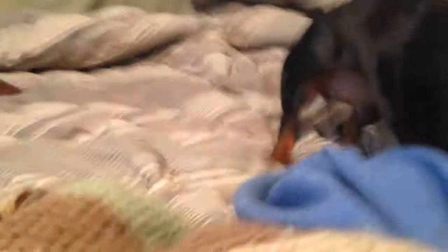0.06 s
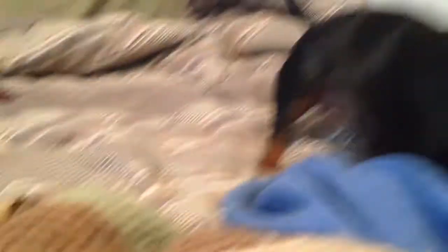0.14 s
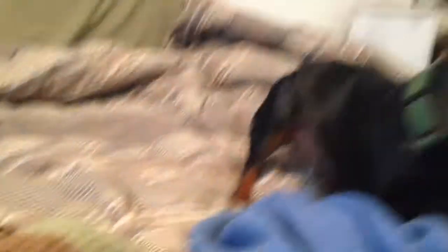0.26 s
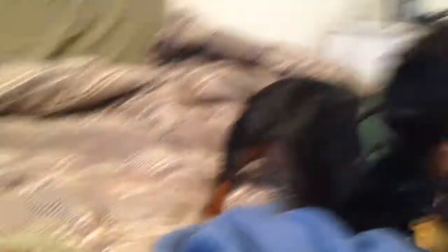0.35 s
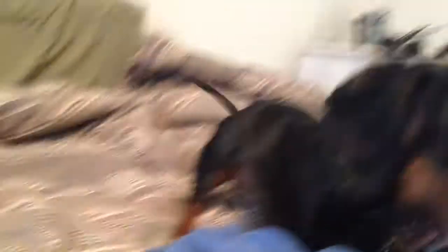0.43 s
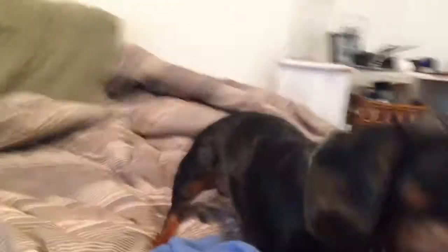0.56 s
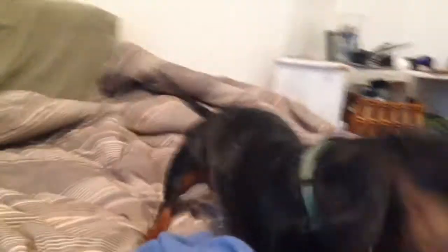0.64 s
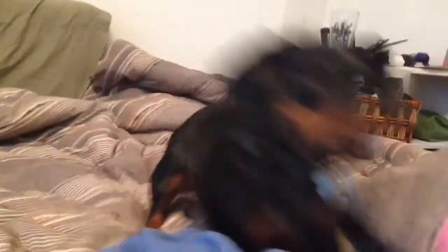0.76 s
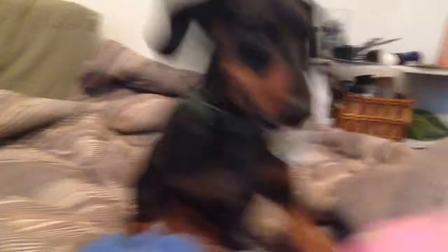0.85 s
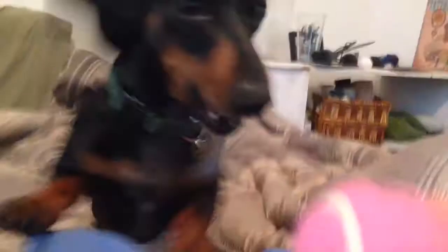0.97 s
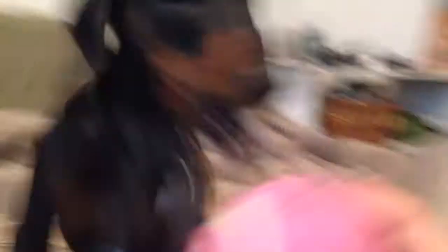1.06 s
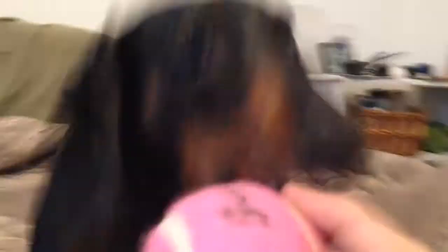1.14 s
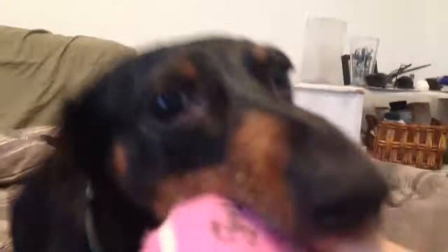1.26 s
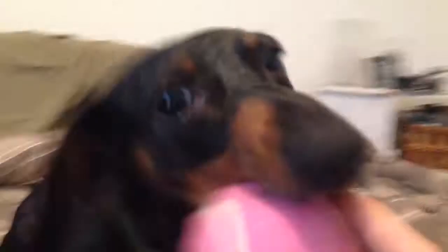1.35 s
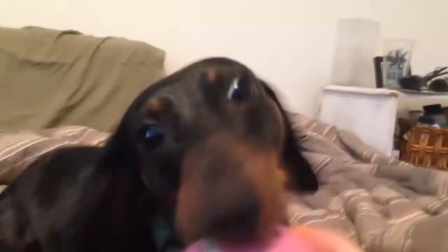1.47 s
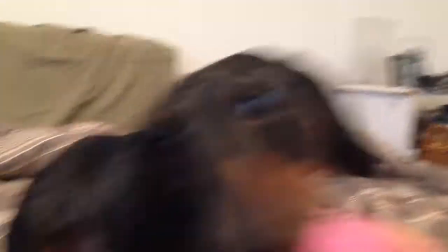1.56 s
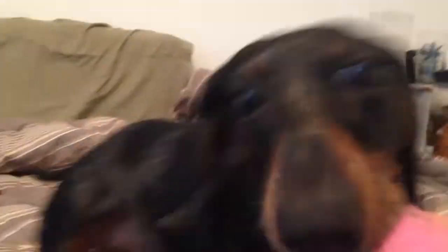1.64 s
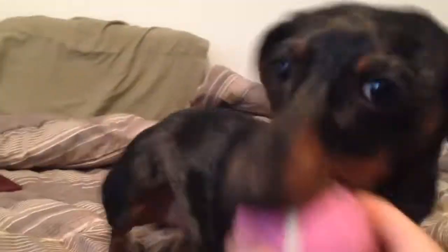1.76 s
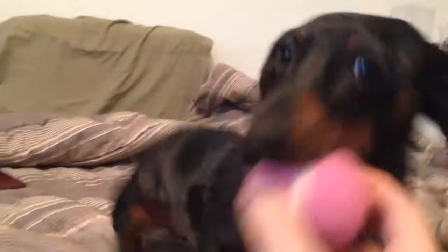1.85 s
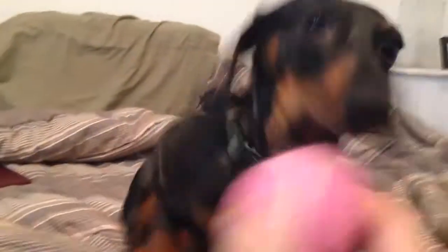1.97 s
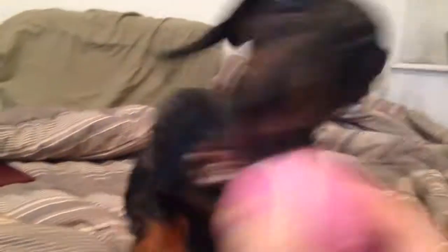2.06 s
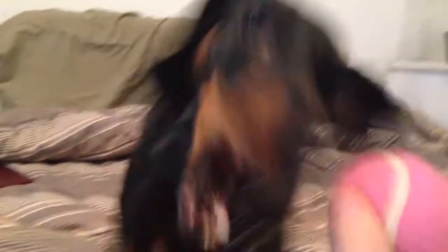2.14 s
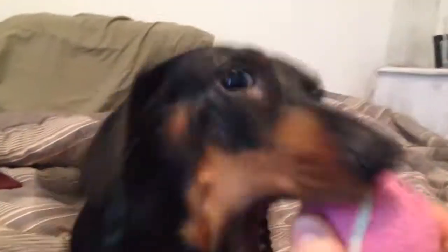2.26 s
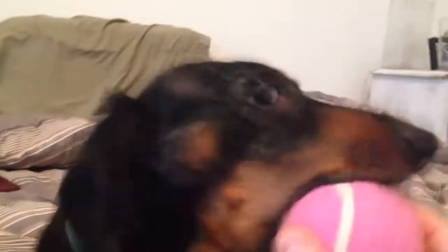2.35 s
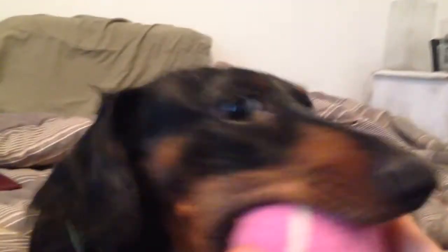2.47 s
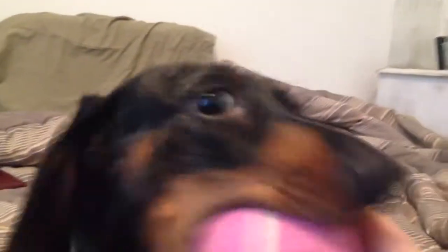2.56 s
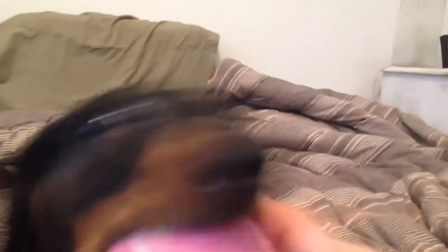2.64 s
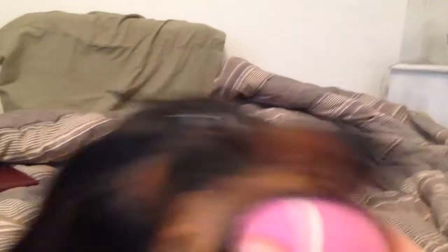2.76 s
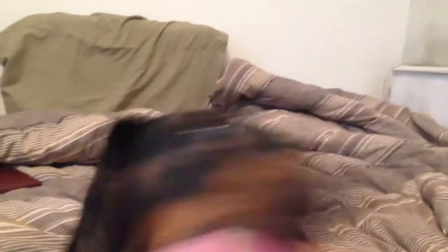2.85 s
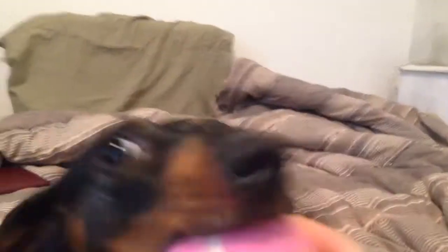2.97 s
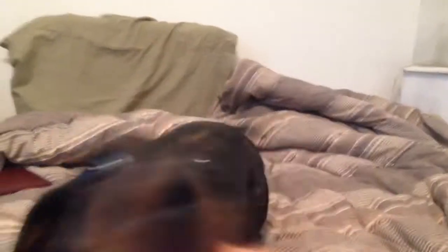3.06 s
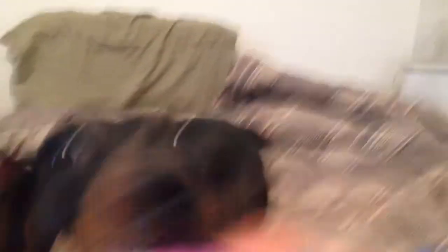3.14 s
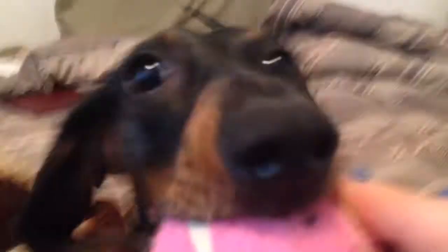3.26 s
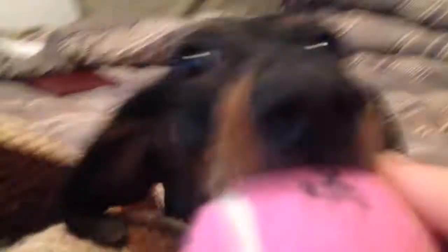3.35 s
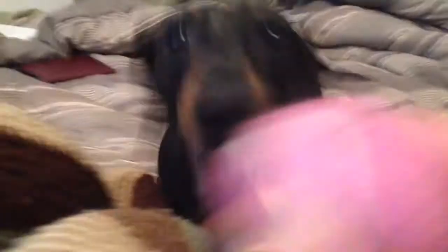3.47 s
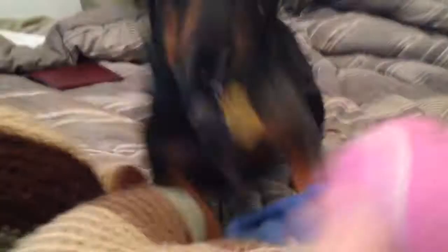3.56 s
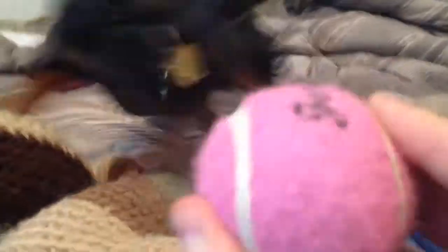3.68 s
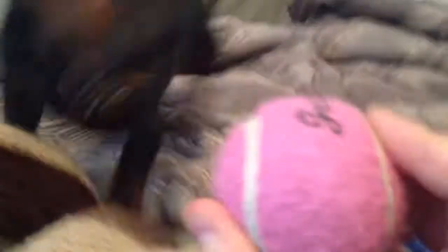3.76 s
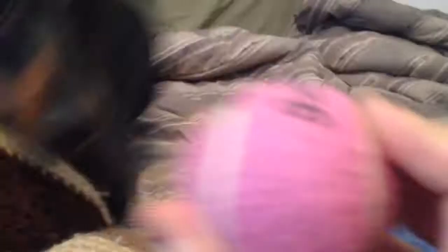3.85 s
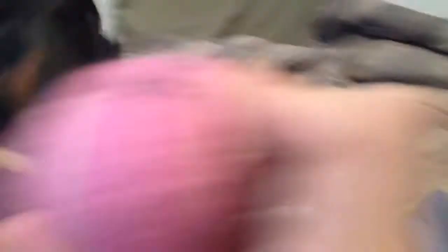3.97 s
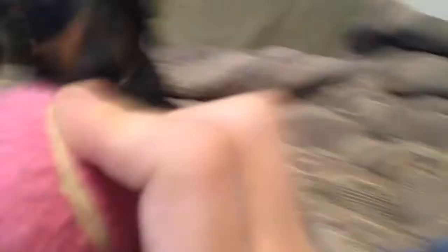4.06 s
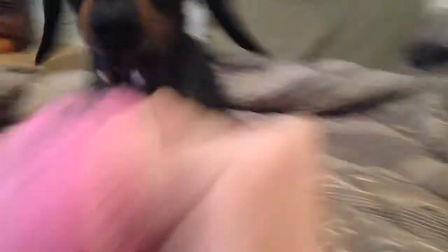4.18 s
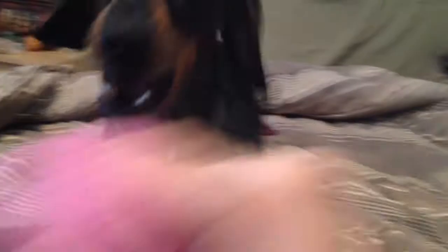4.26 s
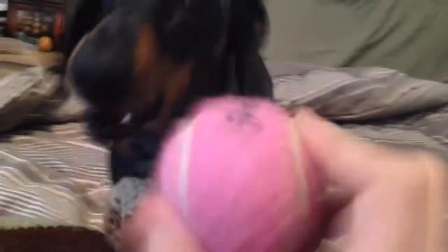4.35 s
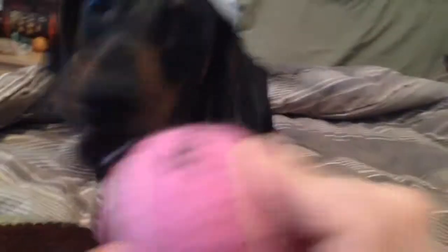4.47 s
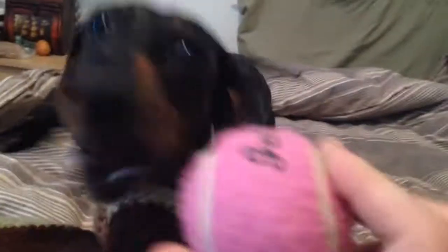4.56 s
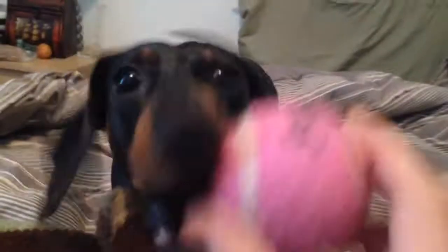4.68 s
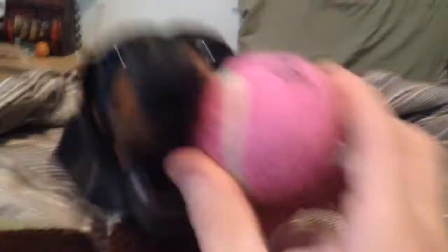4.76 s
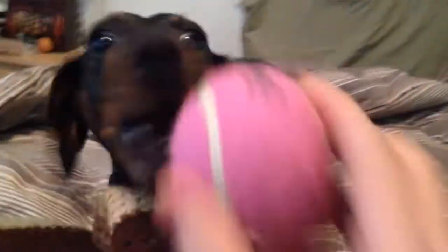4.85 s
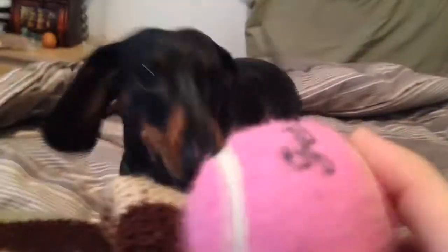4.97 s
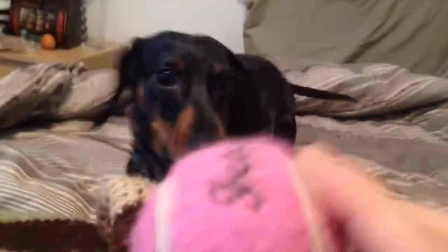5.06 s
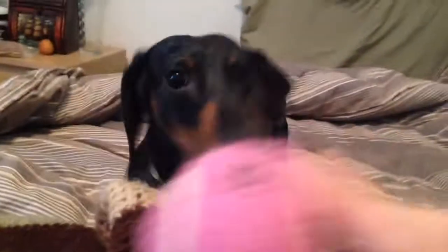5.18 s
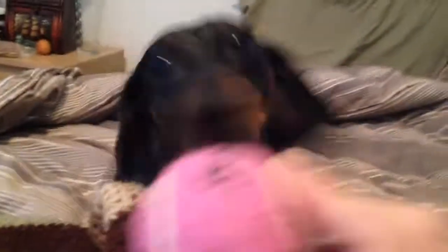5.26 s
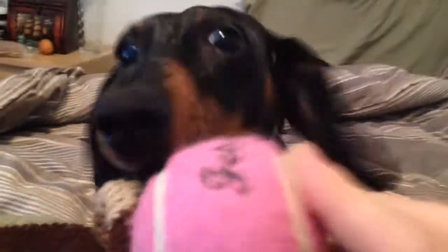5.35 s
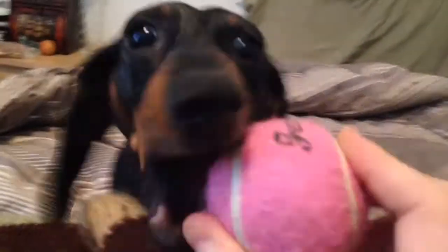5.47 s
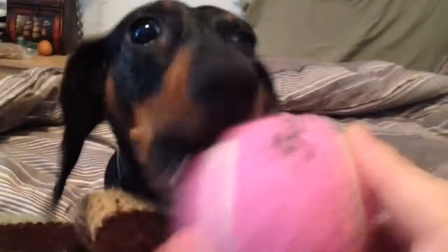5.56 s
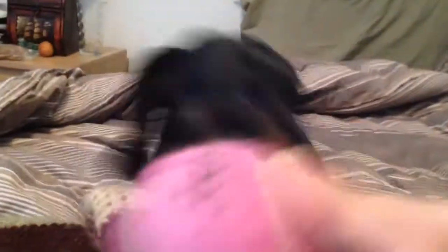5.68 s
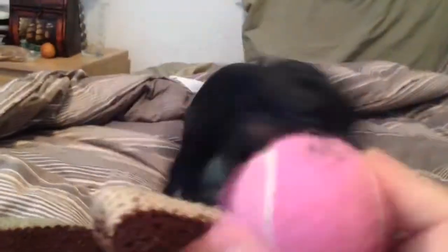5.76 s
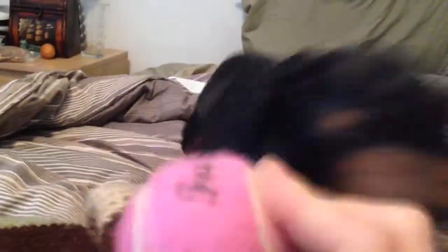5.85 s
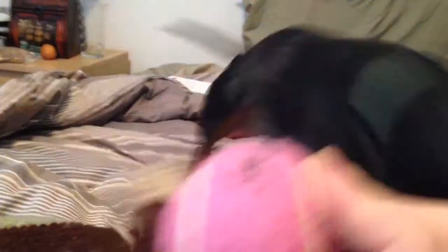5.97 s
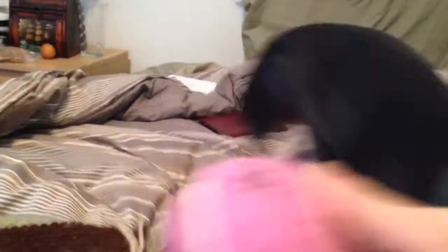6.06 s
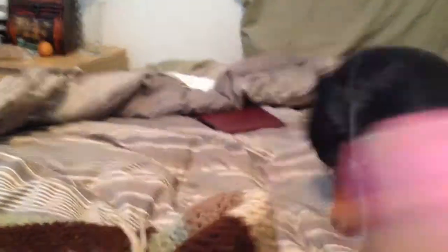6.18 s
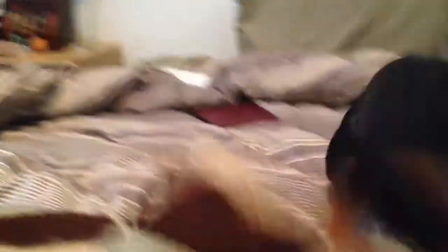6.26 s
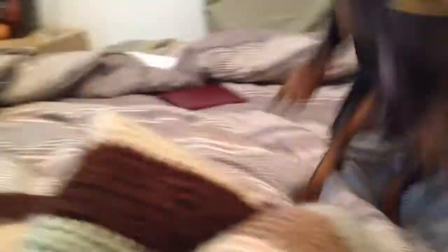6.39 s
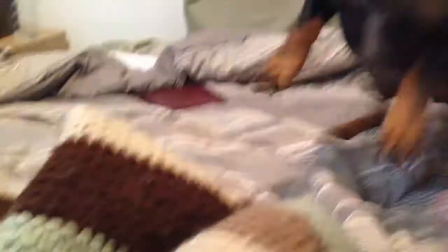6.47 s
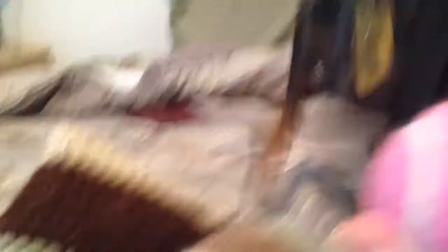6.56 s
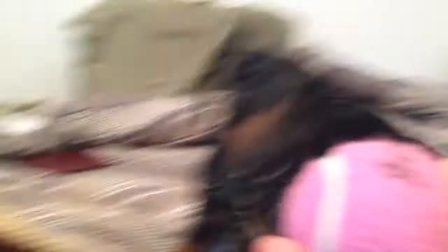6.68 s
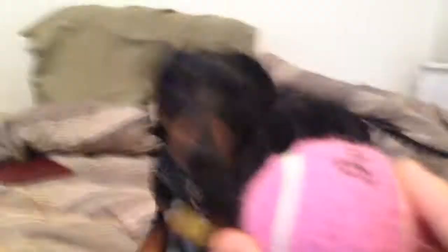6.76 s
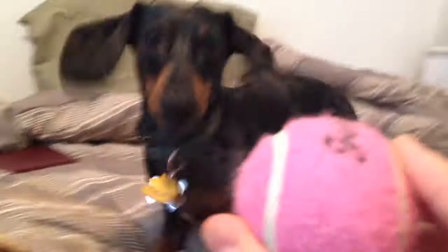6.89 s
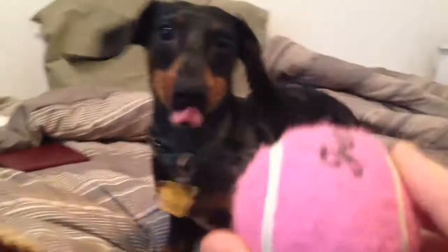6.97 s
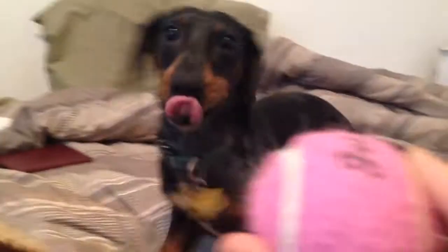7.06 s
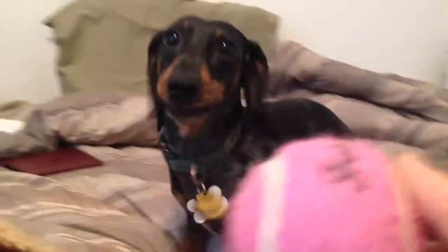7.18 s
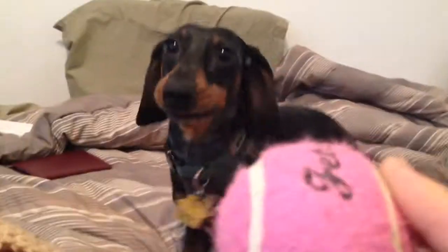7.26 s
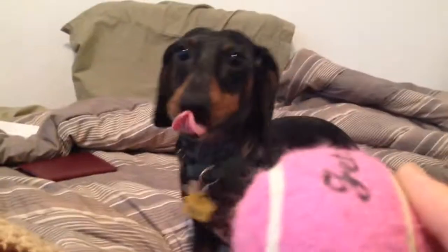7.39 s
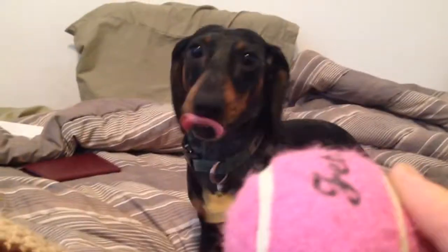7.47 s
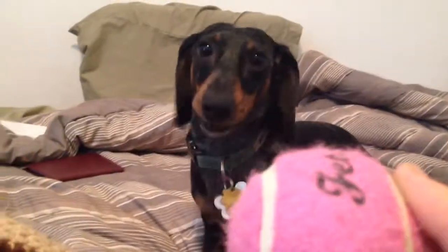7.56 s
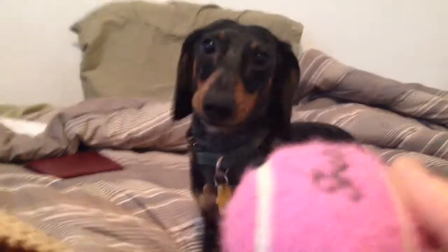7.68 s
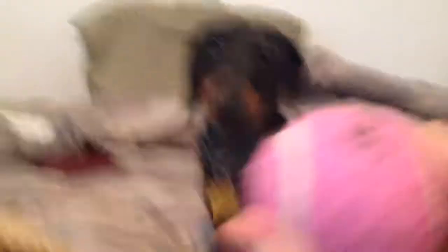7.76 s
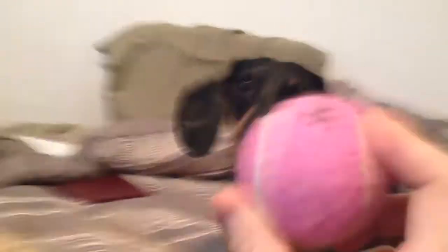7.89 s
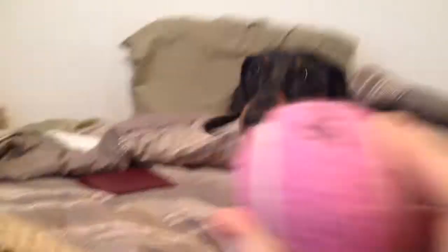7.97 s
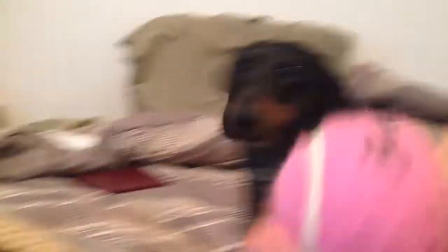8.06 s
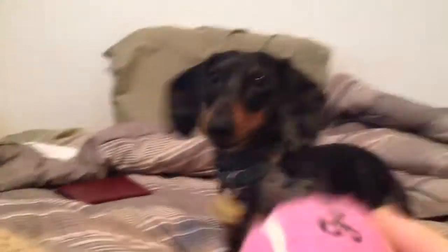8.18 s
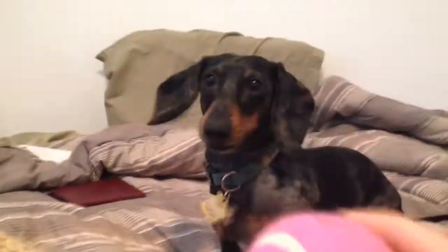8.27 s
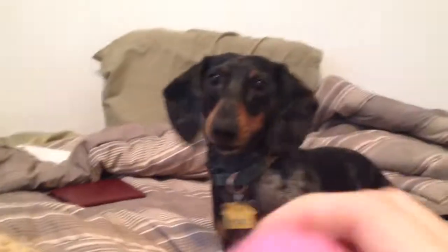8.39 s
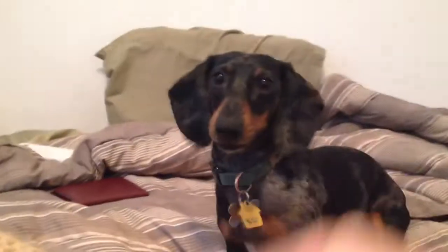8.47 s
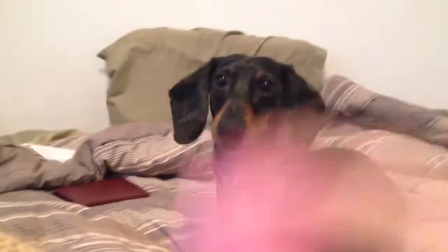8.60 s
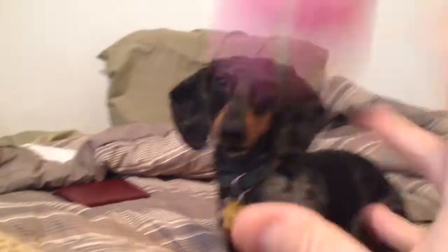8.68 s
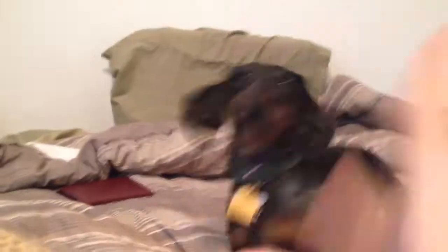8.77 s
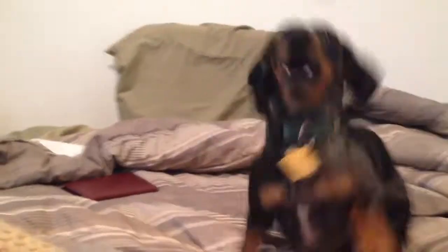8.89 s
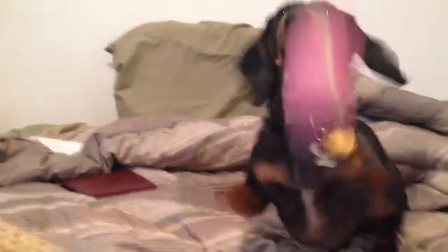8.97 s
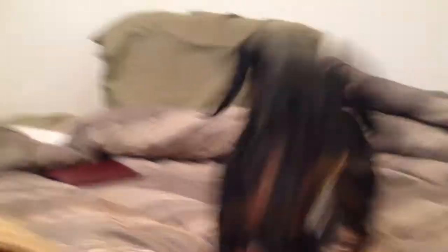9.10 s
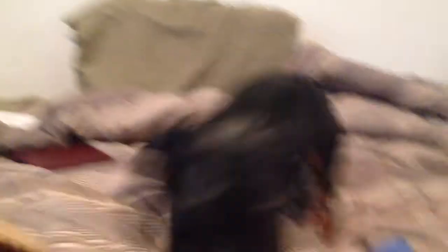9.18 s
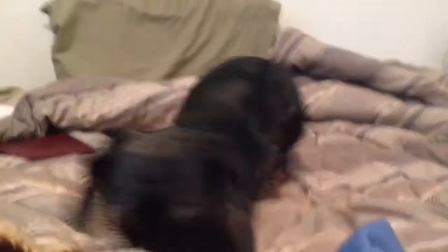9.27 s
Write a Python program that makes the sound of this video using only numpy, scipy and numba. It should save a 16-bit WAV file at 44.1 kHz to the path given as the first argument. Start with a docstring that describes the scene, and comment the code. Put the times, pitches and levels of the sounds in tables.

```python
"""Play growls from a small dog on a bed, close to a phone in a quiet furnished bedroom; one clears to a whine.
Collar tags clink, the dog pants between growls, paws thud on the bedding, an appliance hums far off.
Uneven vocal-fold pulses ring throat and mouth resonances; noise rasps after each pulse.
Tags are decaying sines with noise ticks, pants and room filtered noise, thuds short sine bursts."""
import sys
import numpy as np
from scipy import signal
from scipy.fft import rfft, irfft
from scipy.io import wavfile
from scipy.ndimage import uniform_filter1d
from numba import njit

SR = 44100
rng = np.random.default_rng(int(sys.argv[2]) if len(sys.argv) > 2 else 0)


def inscribe(sig):
    """Save sig as 16-bit PCM at rate SR to the path in sys.argv[1].

    A 1-D sig is mono; a 2-D sig holds one channel per row.
    Samples are clipped to [-1, 1] before scaling.
    """
    pcm = np.round(np.clip(np.atleast_2d(sig).T, -1, 1) * 32767)
    wavfile.write(sys.argv[1], SR, pcm.astype(np.int16))


N = 411453

# Room air spectrum. Each row: frequency in Hz, relative density in dB per Hz.
ROOM_SPECTRUM = [(25, -28), (55, -1), (90, -14.5), (130, -2), (390, -8.5), (700, -13), (1100, -17.5),
                 (2200, -19.5), (2800, -29), (3500, -26), (15500, -34.5)]
# Appliance lines. Each row: centre in Hz, width in Hz of the noise band, rms level in dB.
HUM_LINES = [(130, 2.3, -66), (717, 7.7, -69.5)]
# Tag vibration modes. Each row: frequency in Hz, relative level in dB, longest t60 in s.
TAG_MODES = [(5760, 8.5, 0.3), (6770, 13.5, 0.17), (12260, -7, .17), (12445, -2.5, 0.19),
             (14420, -5, 0.126)]
# Tag contacts. Each row: start in s, tick drive in dB, low tag ring in dB, high tag ring in dB.
CLINKS = [(0.038, -33.5, -69, -49), (0.661, -43, -73, -52), (0.817, -43, -47.5, -33.5),
          (0.827, -39, -64, -45), (0.9283, -31, -49, -39), (0.958, -41, -60, -50), (0.998, -37.5, -68, -54),
          (1.1592, -38.5, -58, -51), (2.057, -73, -67, -62), (2.2116, -45, -73, -55),
          (3.589, -28, -55, -43), (3.613, -27.5, -49.5, -41), (3.649, -45, -61.5, -43),
          (3.952, -41, -63, -40), (4.294, -39, -67, -65), (5.044, -62, -64, -56),
          (5.0909, -68.5, -63, -47.5), (5.8257, -49, -75, -49), (6.0367, -46.5, -57, -55),
          (6.5044, -16, -63, -42), (6.5441, -49, -53, -37), (6.6777, -44.5, -64, -40.5),
          (6.8376, -43, -65, -47), (8.97, -45.5, -73, -64), (9.111, -56.5, -68.5, -62),
          (9.214, -37, -52.5, -37), (9.267, -39, -60, -57)]
# One table a growl, full voice to last breath.
# Each row: time in s, throat level in dB, mouth over throat in dB before surges, mean pitch in Hz.
GROWLS = [
    [(0.688, -27.5, -23, 176.6), (0.733, -24.5, -4.5, 171.5), (0.758, -30, 3.5, 170.5)],
    [(1.287, -20, -58, 159.1), (1.347, -22, 2.5, 174), (1.412, -19, 2, 192.1), (1.532, -22.5, 3, 206.2),
     (1.746, -21, -1, 183.8), (1.786, -28, -16, 155.5), (1.846, -44.5, -7, 152), (1.99, -40.5, -5, 155)],
    [(2.305, -23.5, -7.5, 164.5), (2.39, -23.5, 3.5, 208.6), (2.52, -23, 5, 212.1),
     (2.57, -22.5, -1.5, 190.7), (2.794, -23.5, -3, 186.6), (3.004, -29, -10.5, 168)],
    [(3.322, -18, -16, 165.2), (3.417, -15, -8, 196.4), (3.537, -21, 6.5, 199.4), (3.6, -40.5, -6.5, 190),
     (3.675, -22, -5.5, 181.7), (3.702, -33, -4, 182.7)],
    [(3.876, -26.5, -14, 165), (3.956, -23, -14, 195.4), (3.996, -25, 6.5, 201.6), (4.09, -29, -7, 199.8),
     (4.146, -35.5, -0.5, 163.6)],
    [(4.719, -26.5, -10.5, 172.4), (4.8, -19.5, -1.5, 192.7), (4.98, -19.5, -0.5, 202.5),
     (5.03, -21.5, -3, 201), (5.07, -31.5, -2, 179.2), (5.13, -30.5, -6.5, 193.2), (5.22, -26, -3, 186.6),
     (5.3, -22.5, 7, 237.8), (5.36, -29.5, 18, 238), (5.402, -23.5, 7.5, 264.7), (5.44, -24, 7.5, 271.1),
     (5.474, -22, 9.5, 252.2), (5.512, -25, 8.5, 207.1), (5.59, -22, 9, 229.8), (5.7, -24, -6.5, 203),
     (5.75, -37.5, -10.5, 201.5), (5.81, -36.5, -8, 192)],
    [(6.076, -28, 4.5, 178.8), (6.121, -20, 9, 194), (6.168, -28, 15, 241.8), (6.22, -38, 25, 270.7),
     (6.3, -39, 9, 233), (6.325, -40, 3.5, 188.2), (6.37, -40, 0.5, 168), (6.425, -26.5, 0.5, 217.6),
     (6.465, -39.5, 7.5, 189), (6.515, -42, -56, 160.1)],
    [(6.919, -37, -9, 161.7), (7.054, -32.5, -23.5, 185.6), (7.189, -32, 3.5, 195.7),
     (7.24, -31.5, -11.5, 189.5), (7.638, -38.5, -10.5, 161.5)],
    [(9.174, -27, -22, 190.4), (9.33, -30.5, -39, 182.2)],
]
# Jaw postures, each held until the next. Each row: start in s, roughness 0-1, in-between pulse 0-1,
# base mouth resonance in Hz, second in Hz, second level in dB, third level in dB, base rasp in Hz,
# base rasp level in dB, mean lip hiss in dB.
JAWS = [(0.6, 0.85, .4, 970, 1570, -6, -11, 3780, -13, -21),
        (1.2, 0.85, .45, 946, 1426, -3, -10, 5472, -17.5, 3.5),
        (1.8, 0.8, .15, 917, 1350, -7, -6.5, 3950, -1, -6),
        (2.2, 0.85, .3, 946, 1570, -6.5, -10.5, 4630, -7.5, 7.5),
        (2.38, 0.7, .6, 924, 1346, -6, -19, 4600, -29.5, 16.5),
        (2.55, 0.9, .3, 847, 1310, -7, -19.5, 4160, -22, 7),
        (3.2, 0.92, .35, 849, 1310, -7.5, -22, 4490, -11, -8),
        (3.45, 0.86, .45, 934.4, 1420, -5.5, -4.5, 4730, -18.5, 3),
        (3.58, 0.86, .3, 874.6, 1607, -3, -7, 3933, -24, 10.5),
        (3.8, 0.77, .6, 751.3, 1617, -20, -9, 3418, -14, 6),
        (3.96, 0.87, .4, 831.5, 1322, -19, -4.5, 3234, -38, 14),
        (4.6, 0.75, .55, 863.7, 1570, -6.5, -10.5, 5217, -8.5, -8.5),
        (4.9, 0.61, .7, 800.4, 1530, -15, -14, 5080, -24.5, -1),
        (5.05, 0.77, .25, 864.6, 1500, -8, -4.5, 4664, -32, 8.5),
        (5.24, 0.16, .85, 945.6, 1773, -3.5, -7, 4218, -16.5, -1),
        (5.38, 0.02, .8, 952.7, 1620, -3.5, -8, 7500, -9.5, -5.5),
        (5.49, 0.3, 0.85, 879, 1692, -9.5, -10.5, 4700, -24, 2.5),
        (5.72, 0.5, .1, 850, 1450, -7.5, -4.5, 4700, -39, 0.5),
        (6.0, 0.65, .6, 846.4, 1500, -5.5, -17, 5508, -22.5, -9.5),
        (6.16, 0.34, .6, 827, 1537, -5.5, -12.5, 4574, -8, -11),
        (6.33, 0.78, .35, 853, 1400, -13, -8, 5507, -13.5, 13.5),
        (6.8, 0.75, .5, 748, 1436, -8, -10, 4265, -18, 7),
        (7.03, 0.6, .8, 755.6, 1423, -4, -10, 4140, -11, -1),
        (7.13, 0.8, .3, 776, 1506, -20, -13.5, 4070, -21.5, 4.5),
        (9.0, 0.89, .3, 762.5, 1523, -20, -19, 4166, -6, 16.5)]
# Mouth side pocket. Each row: time in s, swallowed frequency in Hz, open-mouth ring above it in Hz.
POCKET = [(1.5, 2670, 3274), (2.9, 2570, 3387), (3.35, 2936, 3271), (3.65, 2747, 3294), (4.1, 2880, 3120),
          (5.3, 2812, 3216), (6.1, 2647, 3073)]
# Throat resonances. Each row: frequency in Hz, width in Hz of each of two stages, relative level in dB.
THROAT_MODES = [(162.5, 160, 12.5), (398, 388, 3)]
# Lip hiss resonances. Each row: frequency in Hz, width in Hz of each of two stages, relative level in dB.
LIP_MODES = [(5690, 1600, -8.5), (9600, 1900, -17), (13100, 3000, -23)]
# Widths of the three mouth resonances, in Hz for each of two stages.
MOUTH_WIDTHS_HZ = (444, 444, 370)
# Ring above the pocket: width in Hz of each of two stages, relative level in dB.
GAPE = (460, 0)
# One table a breath. Each row: time in s, level in dB.
PANTS = [
    [(2.02, -54), (2.05, -38), (2.15, -49.5), (2.25, -69)],
    [(3.05, -52.5), (3.25, -65)],
    [(3.75, -58), (3.8, -57), (3.83, -66)],
    [(5.84, -64), (5.87, -48), (5.93, -66)],
]
# Panting mouth resonances. Each row: frequency in Hz, width in Hz of each of two stages, relative level in dB.
PANT_MODES = [(1340, 500, 14.5), (2190, 590, 3.5), (3740, 2700, -4)]
# Paws on the bedding. Each row: start in s, envelope peak in dB, frequency in Hz.
THUMPS = [(9.03, -32.5, 393)]

ROOM_DB = -56.5
CLINK_SCATTER_DB = 1  # each contact favours other modes
SHORTEST_RING_SHARE = .45  # fur damps some clinks to this share of t60
ATTACK_S, RELEASE_S, SILENT_DB = 0.042, 0.041, -43.5  # silence relative to each growl's ends
ONSET_PITCH_RATIO = .85
JAW_MOVE_S = 0.021
SETTLE_S, FIRST_BEATS_SHARE = .07, .35  # first beats are cleaner and nearer single
PITCH_WOBBLE = .03  # share of pitch, at full roughness
FLOW_JITTER, WEAK_CLOSING = .7, .8  # ratios: flow to closing jitter, in-between closing to flow
SURGE_DB = 3.5  # a rough voice leaves the mouth in uneven bursts
MOUTH_RISE_HZ_PER_DB = 1
RASP_DB_PER_MOUTH_DB, RASP_DROP_HZ_PER_DB = 0.8932, 86  # a wider mouth rasps louder and lower
GAPE_DB_PER_MOUTH_DB = 1.02
THIRD_UNDER_POCKET_HZ = 620
NOSE_DIP_HZ, NOSE_DIP_WIDTH_HZ, SMALL_CHEST_HZ = 556.3, 110, 131
ECHO_T60_S, ECHO_DB = 0.17, -17
MIC_LOW_HZ, TOP_HZ = 110, 15600


def undb(db):
    """Decibels to gain."""
    return 10 ** (np.asarray(db) / 20)


@njit
def svf(x, hz, width_hz):
    """State-variable band-pass with a moving centre, gain 1 there."""
    y, b, l = np.empty(len(x)), 0., 0.
    for i in range(len(x)):
        g, k = np.tan(np.pi * hz[i] / SR), width_hz / hz[i]
        v = (b + g * (x[i] - l)) / (1 + g * (g + k))
        b, l, y[i] = 2 * v - b, l + 2 * g * v, k * v
    return y


def band(x, hz, width_hz):
    """One resonance, fixed or moving."""
    return svf(x + 1e-18, hz + np.zeros(N), 1. * width_hz)


def body(x, modes):
    """Two-stage resonances in parallel, of alternating sign."""
    out = 0
    for k, (hz, width_hz, db) in enumerate(modes):
        out = out + (-1) ** k * undb(db) * band(band(x, hz, width_hz), hz, width_hz)
    return out


def even(x, window_s=N / SR):
    """Running rms brought to 1."""
    return x / np.sqrt(uniform_filter1d(x ** 2, int(window_s * SR)) + 1e-18)


def walk(rate):
    """Smoothed noise of rms 1 that turns about rate times a second."""
    once = uniform_filter1d(rng.standard_normal(N), SR // rate)
    return even(uniform_filter1d(once, SR // rate))


def along(rows):
    """Each column of (s, value, ..) rows as a line over time."""
    s, *cols = np.transpose(rows)
    return [np.interp(np.arange(N) / SR, s, c) for c in cols]


def held(rows):
    """Each column keeps its value from row to row and moves over quickly."""
    rows = np.array(rows)
    k = np.maximum(np.searchsorted(rows[:, 0], np.arange(N) / SR) - 1, 0)
    return uniform_filter1d(rows[k, 1:].T, int(JAW_MOVE_S * SR), axis=1)


def columns(tables):
    """A gate that shuts softly outside the tables, and their columns joined over time."""
    t = np.arange(N) / SR
    gate = sum((t > table[0][0]) & (t < table[-1][0]) for table in tables)
    return uniform_filter1d(1. * gate, 400), along(np.concatenate(tables))


def room():
    """Shaped noise of wavering level, plus narrow noise bands as the appliance's unsteady lines."""
    f = np.arange(N // 2 + 1) * SR / N + 1  # +1 Hz keeps the log finite
    hz, db = np.transpose(ROOM_SPECTRUM)
    shape = undb(np.interp(np.log(f), np.log(hz), db))
    air = irfft(rfft(rng.standard_normal(N)) * shape, N)
    swell = undb(0.5 * walk(rate=7))
    hum = sum(undb(d) * even(band(rng.standard_normal(N), h, w)) for h, w, d in HUM_LINES)
    return undb(ROOM_DB) * even(air) * swell + hum


def tag_rings(starts):
    """Metal modes decay exponentially; the next contact stops the ring before it."""
    out = np.zeros(N + SR)
    hz, mode_db, t60_s = np.transpose(TAG_MODES)[:, :, None]
    turns = rng.random((len(CLINKS), len(TAG_MODES), 1))
    favour_db = CLINK_SCATTER_DB * rng.standard_normal(turns.shape)
    ring_share = SHORTEST_RING_SHARE + (1 - SHORTEST_RING_SHARE) * turns[:, 2]
    for k, (_, _, low_db, high_db) in enumerate(CLINKS):
        t = np.arange(min(starts[k + 1] - starts[k], SR // 2)) / SR
        db = mode_db + np.where(hz < 8000, low_db, high_db) + favour_db[k]
        db = db + 4 * np.sin(2 * np.pi * (14 * t + 3 * turns[k]))  # the tag twists as it rings
        decay = undb(db - 60 * t / (t60_s * ring_share[k]))
        ring = np.sum(decay * np.sin(2 * np.pi * (hz * t + turns[k])), axis=0)
        out[starts[k]:starts[k] + len(t)] += ring
    return out[:N]


def tag_ticks(starts):
    """Each contact is a brief decaying burst of bright noise."""
    hits = np.zeros(N)
    hits[starts[:-1]] = undb(np.array(CLINKS)[:, 1])
    decay = signal.lfilter([1], [1, -np.exp(-1 / (0.0032 * SR))], hits)
    ticks = decay * rng.standard_normal(N)
    return band(band(ticks, 6300, 8000), 6300, 8000)


def tags():
    """Each contact ticks and rings the collar tags."""
    starts = [int(row[0] * SR) for row in CLINKS] + [N]
    return tag_rings(starts) + tag_ticks(starts)


def efforts():
    """Growl tables with a quick rise before and a quick fall after each."""
    def edge(row, shift_s, pitch_ratio):
        return (row[0] + shift_s, row[1] + SILENT_DB, row[2], pitch_ratio * row[3])
    return [[edge(g[0], -ATTACK_S, ONSET_PITCH_RATIO)] + list(g) + [edge(g[-1], RELEASE_S, 1)]
            for g in GROWLS]


def folds(pitch_hz, set_rough, weak):
    """Strong and in-between pulses each cycle, scattered by roughness; returns flow, closings, roughness."""
    t = np.arange(N) / SR
    starts = np.array([g[0][0] - ATTACK_S for g in GROWLS])
    since = t - starts[np.maximum(np.searchsorted(starts, t) - 1, 0)]
    settled = np.interp(since, [0, SETTLE_S], [FIRST_BEATS_SHARE, 1])
    rough = np.clip(set_rough, 0, 1) * settled
    second = np.clip(weak, 0, 1) * settled
    cycles = np.cumsum(pitch_hz * (1 + PITCH_WOBBLE * rough * walk(rate=14))) / SR
    beat = np.arange(1, 2 * cycles[-1] - 2)  # half cycles
    r = np.interp(beat / 2, cycles, rough)
    # folds miss a beat more easily than they overshoot
    chance = np.clip(rng.standard_normal((len(beat), 4)).T, -2, 1.3)
    chance = chance - chance.mean(axis=1, keepdims=True)
    drift = signal.lfilter([1], [1, -.9], chance[2])  # timing slips last several cycles
    # for stretches every other cycle is weaker and shifted: lines at half the pitch
    stretch = np.tanh(.5 * signal.lfilter([1], [1, -.93], chance[3]))
    limp = r * np.cos(np.pi * beat / 2) * stretch
    slip = r * (.075 * chance[0] + .055 * drift)
    trains = np.zeros((2, N + 1))
    for train, scatter_db, jitter, soft in zip(trains, (3, 4.5), (FLOW_JITTER, 1), (1, WEAK_CLOSING)):
        at = np.interp(beat / 2 + jitter * slip + .13 * limp, cycles, t)
        size = np.where(beat % 2, soft * np.interp(at, t, second), 1) * (1 + .55 * limp)
        size = size * undb(scatter_db * r * chance[1])
        i = np.minimum(at * SR, N - 1)
        # split each pulse over two samples for exact timing
        np.add.at(train, i.astype(int), size * (1 - i % 1))
        np.add.at(train, i.astype(int) + 1, size * (i % 1))
    return trains[0, :N], trains[1, :N], rough


def rasp_and_hiss(air, rasp_hz, lips_db, gape_hz, mouth_db):
    """Pulsed air rings a rasp band, shifting lip hiss and the open-mouth ring."""
    out = band(band(air, rasp_hz, 900), rasp_hz, 1200)
    for mode in LIP_MODES:
        out = out + undb(lips_db + 4.2 * walk(rate=8)) * body(air, [mode])  # lips and tongue keep shifting
    gape_db = GAPE_DB_PER_MOUTH_DB * np.clip(mouth_db, -15, 8)
    return out + undb(gape_db) * body(air, [(gape_hz, *GAPE)])


def growls():
    """Throat, mouth and rasp resonate to the same vocal-fold beats."""
    gate, (throat_db, mouth_db, pitch_hz) = columns(efforts())
    (set_rough, weak, mouth_hz, second_hz, second_db, third_db,
     rasp_hz, rasp_db, lips_db) = held(JAWS)
    pocket_hz, gape_hz = along(POCKET)
    rasp_db = rasp_db + RASP_DB_PER_MOUTH_DB * mouth_db
    mouth_hz = mouth_hz + MOUTH_RISE_HZ_PER_DB * np.maximum(mouth_db, -10)
    rasp_hz = rasp_hz - RASP_DROP_HZ_PER_DB * np.maximum(mouth_db, 0)

    flow, closings, rough = folds(pitch_hz, set_rough, weak)
    puff = signal.lfilter([1], [1, -np.exp(-1 / (0.0034 * SR))], closings)  # air rushes after each pulse
    hiss = rough * puff * rng.standard_normal(N)
    source = closings + 0.07 * hiss

    throat = even(body(flow, THROAT_MODES), 0.19)
    mouth_centres_hz = (mouth_hz, second_hz, pocket_hz - THIRD_UNDER_POCKET_HZ)
    mouth = body(source, zip(mouth_centres_hz, MOUTH_WIDTHS_HZ, (0, second_db, third_db)))
    surge_db = SURGE_DB * rough * walk(rate=20)
    voiced = throat + undb(mouth_db + surge_db) * even(mouth, 0.58)
    # the nose drains one band of the rough growl
    voiced = voiced - 1.6 * rough * band(voiced, NOSE_DIP_HZ, NOSE_DIP_WIDTH_HZ)

    rasp = rasp_and_hiss(source + 0.4 * hiss, rasp_hz, lips_db, gape_hz, mouth_db)
    voice = voiced + undb(rasp_db) * even(rasp, 0.42)
    for _ in range(2):  # the side pocket swallows its band
        voice = voice - band(voice, pocket_hz, 380)
    chest = signal.butter(6, SMALL_CHEST_HZ, "high", fs=SR, output="sos")
    return gate * undb(throat_db) * signal.sosfilt(chest, voice)


def pants():
    """Breath noise through the open mouth's resonances."""
    gate, (db,) = columns(PANTS)
    return gate * undb(db) * even(body(rng.standard_normal(N), PANT_MODES))


def paws():
    """Soft thuds on the bedding: sines under short bell-shaped envelopes."""
    t = np.arange(N) / SR
    out = np.zeros(N)
    for start_s, db, hz in THUMPS:
        envelope = np.exp(-((t - start_s - .008) / 0.0016) ** 2)
        out += undb(db) * envelope * np.sin(2 * np.pi * hz * (t - start_s))
    return out


def wall_echo(near):
    """Walls return a short dull echo: decaying low-passed noise as impulse response."""
    t = np.arange(SR // 2) / SR
    dull = signal.lfilter([.3], [1, -.7], rng.standard_normal(len(t)))
    echo = dull * undb(-60 * t / ECHO_T60_S) * (t > .006)
    return undb(ECHO_DB) * signal.fftconvolve(near, echo / np.sqrt(np.sum(echo ** 2)))[:N]


def scene():
    """Near sounds, their echo and the room."""
    near = tags() + growls() + pants() + paws()
    return (near + wall_echo(near) + room())[None]


def record(dry):
    """The phone thins the bass, rounds peaks and cuts the top."""
    low = signal.butter(2, MIC_LOW_HZ, fs=SR, output="sos")
    x = dry[0] - 1.3 * signal.sosfilt(low, dry[0])
    x = 1.042 * np.tanh(x / 1.053)
    top = signal.ellip(10, .2, 70, TOP_HZ, fs=SR, output="sos")
    return signal.sosfilt(top, x)[None]


dry = scene()
out = record(dry)
inscribe(out)
```